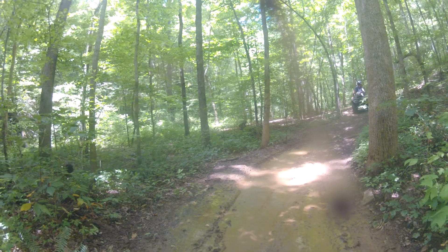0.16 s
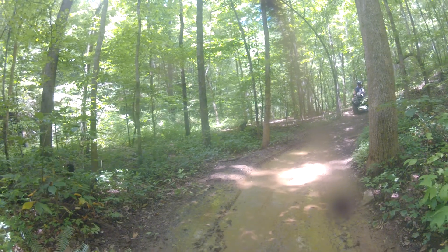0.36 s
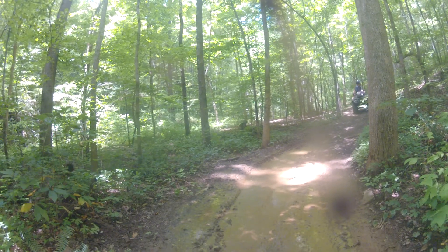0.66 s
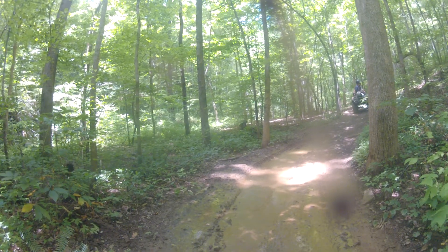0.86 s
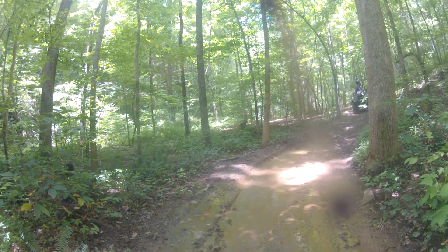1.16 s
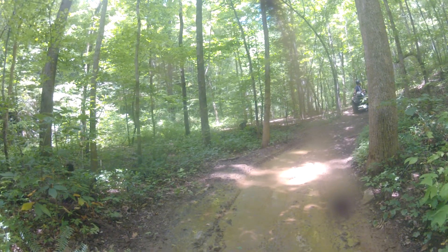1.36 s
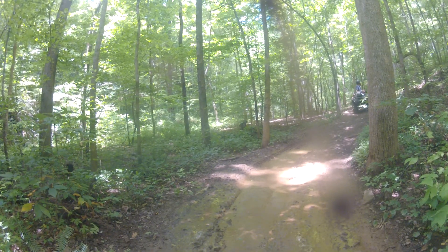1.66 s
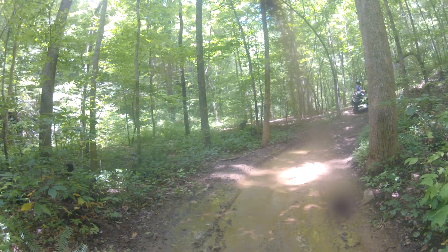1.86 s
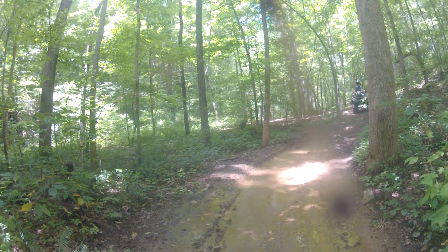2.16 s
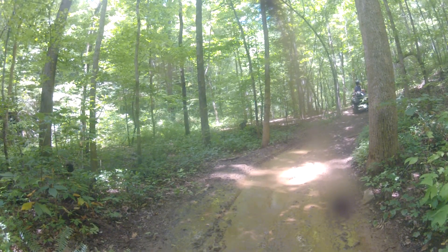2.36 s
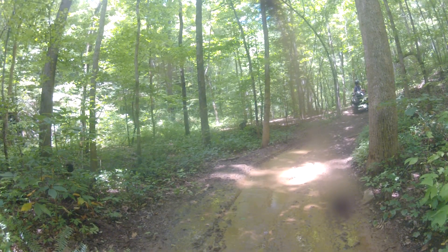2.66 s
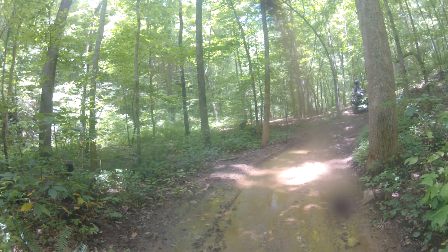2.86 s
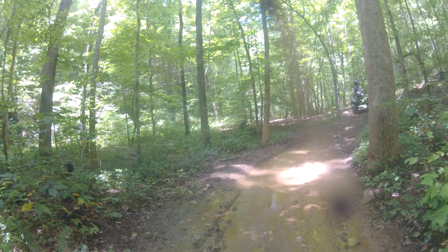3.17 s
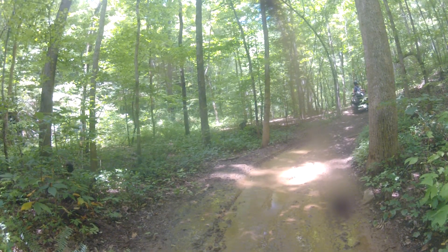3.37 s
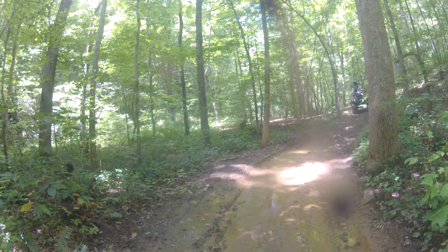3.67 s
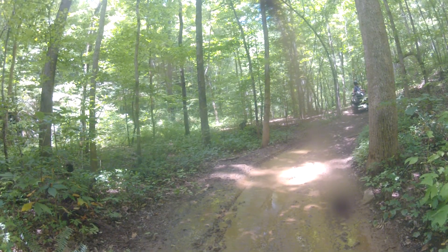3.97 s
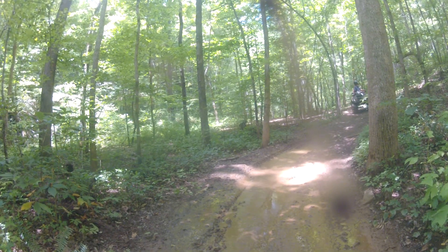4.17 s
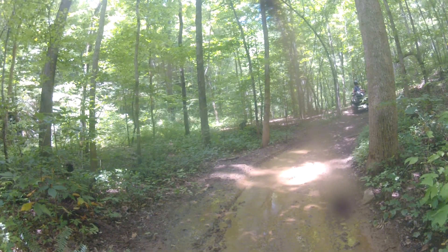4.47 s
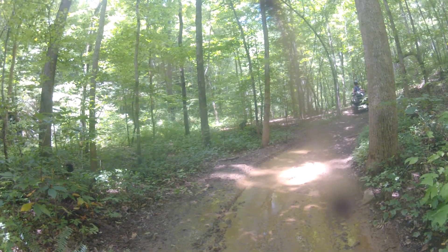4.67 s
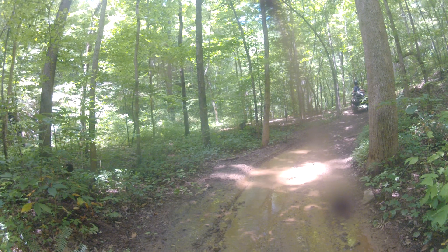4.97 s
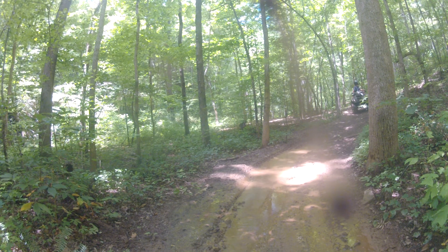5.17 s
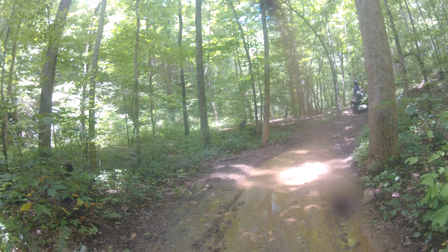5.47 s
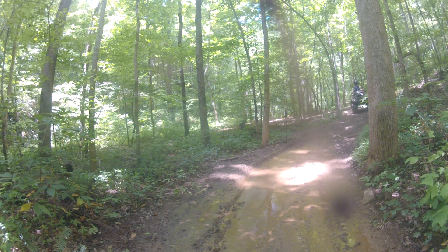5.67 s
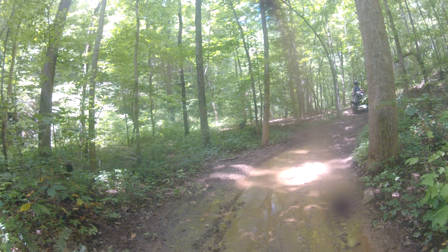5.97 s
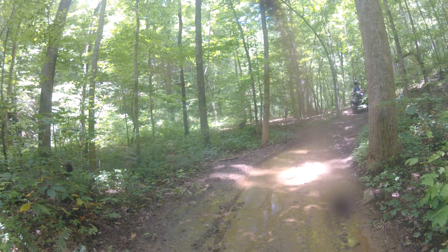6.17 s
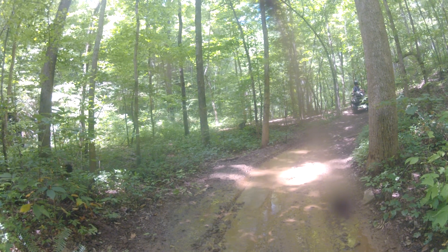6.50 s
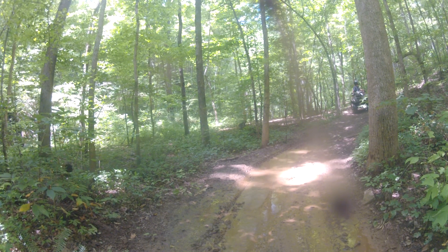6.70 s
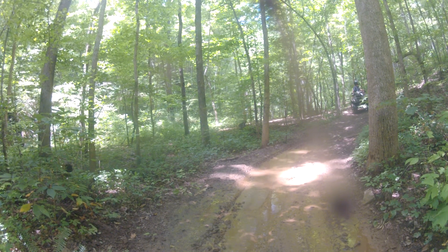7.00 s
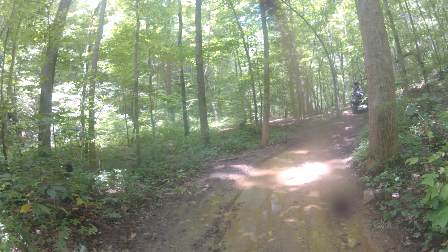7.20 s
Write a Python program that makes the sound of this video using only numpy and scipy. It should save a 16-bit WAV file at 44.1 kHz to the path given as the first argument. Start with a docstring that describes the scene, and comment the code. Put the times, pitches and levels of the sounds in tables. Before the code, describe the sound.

A small single-cylinder trail vehicle engine idles with loose, clattering knocks and a low boom, then thumps and revs up under load at the end.

```python
"""A single-cylinder four-stroke trail vehicle idles on a forest track, with the microphone on its own frame.
The frame booms and hums as engine orders meet its resonances; the mounts pass a drone and the exhaust puffs.
Blows at fixed places in the cycle ring the crankcase, a loose rocker, the drive and the head, over a rumble.
Single hard firings stand out; near the end the engine picks up under load with a few thumps.
The recorder samples at a low rate and holds each sample, which mirrors the treble."""
import sys
import numpy as np
from scipy import signal
from scipy.fft import rfft, irfft
from scipy.io import wavfile
from scipy.ndimage import uniform_filter1d

SR = 44100
rng = np.random.default_rng(int(sys.argv[2]) if len(sys.argv) > 2 else 0)


def generate_wav(signal):
    """Clip the signal to [-1, 1] and save it as 16-bit WAV at the path in sys.argv[1]."""
    frames = np.transpose(np.atleast_2d(signal))
    scaled = np.clip(frames, -1, 1) * 32767
    pcm = np.round(scaled).astype(np.int16)
    wavfile.write(sys.argv[1], SR, pcm)


N = 323694
TIME = np.arange(N) / SR

# Resonances of bodies that sound in several ways; width is taken at half amplitude, levels are relative.
# exhaust pipe and panels: hz, width_hz, level_db
PIPE_MODES = [(172, 46, -6.5), (224, 42, -5.5), (261.6, 49, -0.5), (305, 57, 1.5), (349, 83, 0.5),
              (413.7, 42, -5), (483, 33, -16), (609, 53, -15.5)]
# piston and block at a firing: hz, width_hz, level_db
PISTON_MODES = [(894, 77, -3.5), (947, 50, 0.5), (741, 63, -11.5)]
# rocker and its cover: hz, width_hz, level_db
ROCKER_MODES = [(1704, 50, -12), (1966, 43, -2), (2247, 123, 3), (2348, 80, 8), (2340, 170, -13),
                (2454, 118, -1)]
# cylinder head: hz, width_hz, level_db
HEAD_MODES = [(1815, 52, 5.5), (2066, 47, 5), (2226, 340, 1.5), (3130, 190, -0.5), (3400, 94, -16),
              (3694, 224, 3), (3890, 90, -27)]


def undb(db):
    """Decibels to an amplitude factor."""
    return 10 ** (np.asarray(db) / 20)


def unit(x):
    """Scale to rms 1."""
    return x / np.sqrt(np.mean(x ** 2))


def curve(table):
    """Points joined by straight lines in time."""
    return np.interp(TIME, *np.transpose(table))


def bump(at_s, width_s):
    """A rounded rise from 0 to 1 and back."""
    return np.exp(-((TIME - at_s) / width_s) ** 2)


def late(x, lag_s):
    """The same control, a moment later."""
    return np.interp(TIME - lag_s, TIME, x)


def walk(rate_hz):
    """Random levels, each held for one period of the rate, smoothed twice and scaled to rms 1."""
    hold = int(SR / rate_hz)
    steps = np.repeat(rng.standard_normal(N // hold + 1), hold)
    smooth = uniform_filter1d(uniform_filter1d(steps, hold), hold)
    return unit(smooth[:N])


def ring(x, modes):
    """Pass x through a body with steep resonances, as a causal minimum-phase filter."""
    size = 2 ** 13
    f = np.arange(size // 2 + 1) * SR / size
    power = sum(undb(2 * db) / (1 + (2 * (f - hz) / width) ** 2) ** 2 for hz, width, db in modes)
    # folding the cepstrum onto positive times makes the response causal
    cepstrum = irfft(np.log(power + 1e-9) / 2)
    cepstrum[1:size // 2] *= 2
    cepstrum[size // 2 + 1:] = 0
    response = irfft(np.exp(rfft(cepstrum)))
    return signal.fftconvolve(x, response)[:N]


def clicks(times, sizes):
    """One impulse at each time."""
    out = np.zeros(N)
    inside = (times > 0) & (times < TIME[-1])
    np.add.at(out, (times[inside] * SR).astype(int), sizes[inside])
    return out


def scrape(hits, decay_s):
    """Each blow leaves a short burst of noise that carries the same energy; the energy decays over decay_s."""
    keep = np.exp(-1 / (decay_s * SR))
    energy = signal.lfilter([1 - keep], [1, -keep], hits ** 2 + 1e-18)
    return np.sqrt(energy) * rng.standard_normal(N)


def blows(cycle, pattern, jitter_s, scatter_db):
    """Impulses at fixed places in the engine cycle, each a little early or late, weak or strong."""
    place, db = np.transpose(pattern)
    places = (np.arange(-1, int(cycle[-1]) + 1)[:, None] + place).ravel()
    chance = rng.standard_normal((len(places), 2))
    times = np.interp(places, cycle, TIME, left=-1, right=-1) + jitter_s * chance[:, 0]
    return clicks(times, undb(np.resize(db, len(places)) + scatter_db * chance[:, 1]))


def jolts(table, modes, decay_s):
    """Single heavy blows on a body, with levels relative to the peak of its plain ring."""
    s, db = np.transpose(table)
    hits = clicks(s, undb(db))
    peak = np.abs(ring(signal.unit_impulse(N), modes)).max()
    return ring(hits + 0.37 * scrape(hits, decay_s), modes) / peak


def crank_rpm():
    """The slow course of the engine speed, with a rounded bump at each surge."""
    # hunting idle, then the pick-up: time_s, speed_rpm
    speed = [(0.0, 1477.3), (0.408, 1399.9), (1.125, 1364.1), (1.72, 1399.9), (2.189, 1376.6),
             (2.473, 1413.3), (3.02, 1377.5), (3.546, 1389.5), (4.088, 1441.3), (4.431, 1379.6),
             (4.909, 1421.1), (5.337, 1384.3), (5.994, 1446.8), (6.249, 1343.3), (6.357, 1373.6),
             (6.489, 1647.0), (6.884, 1956.1), (7.34, 2087.7)]
    # brief surges of the idle: time_s, added_rpm
    surges = [(1.397, 76.2), (3.278, 49.7), (4.386, 49.3), (5.465, 42.8)]
    return curve(speed) + sum(rpm * bump(s, width_s=0.089) for s, rpm in surges)


def frame(cycle, firing_hz, load, orders, centre_hz, width_hz, waver_db):
    """Engine orders sweep through a frame resonance; their sum is held near rms 1, so the nearest dominates."""
    out, power = 0, 0
    for multiple, db, load_db in orders:
        hz = multiple * firing_hz
        detuning = centre_hz / width_hz * (hz / centre_hz - centre_hz / hz)
        response = undb(db + load * load_db) / (1 + 1j * detuning)
        # the last factor gives each order its own fixed phase
        wave = np.exp(2j * np.pi * multiple * cycle) * 1j ** (multiple * multiple)
        out = out - np.real(response * wave) * undb(waver_db * walk(14))
        power = power + np.abs(response) ** 2
    return out / np.sqrt(power / 2)


def sway(firing_hz):
    """How hard the frame shakes: strongest, a moment late, when an order sits on its resonance."""
    frame_hz, width_hz, lag_s, off_resonance_db = 44.23, 5.13, 0.073, -47
    # orders that shake the frame: multiple_of_firing_rate, level_at_resonance_db
    shakers = [(3, -13.5), (4, -11)]
    felt_hz = late(firing_hz, lag_s)
    power = undb(off_resonance_db) ** 2
    for multiple, db in shakers:
        size = undb(db) / (1 + (2 * (multiple * felt_hz - frame_hz) / width_hz) ** 2)
        power = power + size ** 2
    return np.sqrt(power)


def boom(cycle, firing_hz, load):
    """Low engine orders shake the frame near its resonance, so the boom swells and thins with the speed."""
    # relative levels: multiple_of_firing_rate, level_db, added_under_load_db
    boom_orders = [(3, 4, -5), (4, 8.5, -22), (5, -5.5, -12)]
    tone = frame(cycle, firing_hz, load, boom_orders, centre_hz=45.67, width_hz=11.7, waver_db=0.5)
    return tone * sway(firing_hz)


def hum(cycle, firing_hz, load):
    """Higher orders excite a resonance about an octave above the boom; the hum drops out briefly at times."""
    # relative levels: multiple_of_firing_rate, level_db, added_under_load_db
    hum_orders = [(6, -20, 31), (8, 4, -9), (9, -0.5, -6), (10, 0, -15)]
    # course of the level before dips and trim: time_s, level_db
    hum_course = [(0, -34), (0.6, -32.5), (1.2, -34.5), (3.2, -34.5), (4.35, -38.5), (5.3, -30.5),
                  (6.1, -35), (6.55, -35), (6.85, -24.5), (7.34, -29.0)]
    # brief drop-outs: time_s, change_db
    hum_dips = [(0.24, -14), (0.95, -6.5), (5.57, -10), (6.25, -8.5)]
    level_db = curve(hum_course) + sum(db * bump(s, width_s=0.058) for s, db in hum_dips)
    tone = frame(cycle, firing_hz, load, hum_orders, centre_hz=94.3, width_hz=16.5, waver_db=2.5)
    return tone * undb(level_db - 0.9 + 1.3 * load)


def drone(cycle, load):
    """Crank and firing harmonics that the engine mounts pass on; each wavers a little."""
    # relative levels: multiple_of_firing_rate, level_at_idle_db, level_under_load_db
    drone_orders = [(2, -29, 8), (4, 6, 9), (6, 2.5, -13), (7, -1.5, -3), (10, -6, -2), (11, -8.5, -3),
                    (13, -19, -2), (14, -7, -7), (15, -2, -2), (16, -8.5, -2.5), (17, -7.5, -27),
                    (19, -4.5, -10), (20, -14, -2), (21, -13, -6.5), (22, -7, -10), (26, -4.5, -13)]
    # course of the level before a trim: time_s, level_db
    drone_course = [(0, -42), (0.6, -48.5), (1.75, -41.5), (3.9, -41.0), (4.4, -46.0), (4.7, -40),
                    (5.2, -46.5), (6.1, -46), (6.5, -40.5), (7.34, -42.5)]
    out = 0
    for multiple, idle_db, load_db in drone_orders:
        db = idle_db + load * (load_db - idle_db) + 1.5 * walk(9)
        # under load the phase wanders too
        phase = multiple * cycle + rng.random() + 0.0069 * multiple * load * walk(18)
        out = out + undb(db) * np.sin(2 * np.pi * phase)
    return out * undb(curve(drone_course) + 2.5)


def exhaust(cycle, load):
    """Pressure pulses ring the pipe and the panels, with an equally strong wake that repeats every cycle."""
    # pulses in one cycle: place_cycles (0-1), relative level_db
    puff_pattern = [(.0, -4), (0.191, -1.5), (0.257, -1.5), (.42, -0.5), (0.502, -2.5), (0.691, -2),
                    (0.781, 0.5), (.89, -4)]
    # course of the level before a trim: time_s, level_db
    exhaust_course = [(0, -36.5), (0.6, -42), (1.2, -40.0), (4.4, -39.5), (5.4, -35.5), (6.1, -36.0),
                      (6.5, -33.0), (6.7, -37.0), (7.05, -33.5), (7.34, -35.5)]
    hits = blows(cycle, puff_pattern, jitter_s=0.00032, scatter_db=2.5)
    puffs = unit(ring(hits + 0.5 * scrape(hits, decay_s=0.011), PIPE_MODES))
    # the wake is one random waveform, replayed each cycle with a wavering level
    size = 512
    shape = irfft(np.exp(2j * np.pi * rng.random(size // 2 + 1)))
    wake = np.interp(cycle, np.arange(size) / size, shape, period=1) * undb(2 * walk(20))
    both = unit(puffs + unit(ring(wake, PIPE_MODES)))
    return both * undb(curve(exhaust_course) + 0.72 - 0.9 * load)


def crankcase(cycle, load):
    """The piston knocks at each firing and slaps the block; gear blows ring the case, more so under load."""
    # piston slaps: place_cycles (0-1), relative level_db
    slap_pattern = [(0.95, -3), (0.0394, -4.5), (.36, -3), (.46, -4.5), (.66, -3)]
    # gear blows: place_cycles (0-1), relative level_db
    gear_pattern = [(0.0, 1), (0.29, 3), (0.4, -7.5), (0.52, 0), (0.67, -2)]
    # resonances of the block: hz, width_hz, relative level_db
    block_modes = [(684, 12, -14), (758, 67, -4.5), (909, 79, -3), (946.7, 36, 2), (1169, 60, -5.5)]
    # resonances of the case: hz, width_hz, relative level_db
    case_modes = [(906, 140, -5.5), (1173, 92, 0.5), (1222, 47, -6.5), (1276, 55, -2.5), (1355, 34, -8.5)]
    firing = blows(cycle, [(0.945, 0)], jitter_s=0.0005, scatter_db=2.5)
    knock = unit(ring(firing + 0.2 * scrape(firing, decay_s=0.008), PISTON_MODES))
    slaps = blows(cycle, slap_pattern, jitter_s=0.0006, scatter_db=0.5)
    block = unit(ring(slaps + 1.37 * scrape(slaps, decay_s=0.013), block_modes))
    gears = blows(cycle, gear_pattern, jitter_s=0.000967, scatter_db=2.5)
    case = unit(ring(gears + 2.06 * scrape(gears, decay_s=0.017), case_modes))
    mix = knock * undb(-8 - 3.3 * load) + block * undb(-4 - 2 * load) + case * undb(-5 + 3.7 * load)
    return mix * undb(-41.5 + 2 * load)


def loose_rocker(cycle, load):
    """A loose rocker knocks hard once a cycle, bounces and knocks again more softly; load takes up its slack."""
    loosen_s, tight_db = 1.6, -10
    soften_at_s, soften_s, soften_db = 4.8, 0.25, -3
    delayed_hz, delayed_width_hz = 2157, 240
    # knocks in one cycle: place_cycles (0-1), relative level_db
    knock_pattern = [(.958, 0), (.05, -13), (.1, -18), (.147, -17), (.316, -8), (.62, -19)]
    hits = blows(cycle, knock_pattern, jitter_s=0.00014, scatter_db=2.2)
    knock = ring(hits + 0.17 * scrape(hits, decay_s=0.03), ROCKER_MODES)
    # an allpass holds back the band around delayed_hz, which smears each knock
    pole = np.exp((2j * delayed_hz - delayed_width_hz) * np.pi / SR)
    allpass = np.poly([pole, pole.conjugate()]).real
    smeared = unit(signal.lfilter(allpass[::-1], allpass, knock))
    # the rocker works loose as the idle settles, and later softens a little
    slack_db = tight_db * np.maximum(1 - TIME / loosen_s, 0)
    slack_db += soften_db * np.clip((TIME - soften_at_s) / soften_s, 0, 1)
    return smeared * undb(-42.5 + slack_db - 33 * load)


def cam_chain():
    """The cam chain whirrs in the rocker cover: steady noise through the same resonances."""
    return unit(ring(rng.standard_normal(N), ROCKER_MODES)) * undb(-55)


def drive(cycle, rpm, load):
    """Chain and gear backlash: sharp uneven ticks at fixed places, harder while the crank gains speed."""
    snatch_db, snatch_rpm_per_s, snatch_lag_s = 4.5, 1000, 0.053
    # ticks in one cycle: place_cycles (0-1), relative level_db
    clatter_pattern = [(.06, -7), (.13, -8), (.21, -5), (0.262, -7), (.35, -6.5), (.44, -5), (.48, -7),
                       (.57, -4), (.755, -2.5), (.86, -6.5), (0.929, -5.5)]
    # resonances of the drive: hz, width_hz, relative level_db
    drive_modes = [(2020, 400, -2.5), (2540, 740, -7), (3418, 260, -2.5), (3656, 160, -3.5), (4370, 355, 3),
                   (4840, 1210, -4), (5520, 1250, -11)]
    hits = blows(cycle, clatter_pattern, jitter_s=0.0011, scatter_db=1.7)
    ticks = 0.6 * hits + scrape(hits, decay_s=0.0016)
    clatter = unit(ring(ticks + 0.64 * scrape(hits, decay_s=0.006), drive_modes))
    snatch = late(np.clip(np.gradient(rpm, TIME) / snatch_rpm_per_s, 0, 1), snatch_lag_s)
    # the clatter drops away briefly once the engine pulls
    lull_db = -7 * bump(6.96, width_s=0.1)
    return clatter * undb(-45 - 4 * load + snatch_db * snatch + lull_db + 0.5 * walk(7))


def tappets(cycle, load):
    """Valves seat against the cylinder head, louder under load."""
    # seatings in one cycle: place_cycles (0-1), relative level_db
    tappet_pattern = [(.23, 3.5), (.62, -5.5), (.93, -1)]
    hits = blows(cycle, tappet_pattern, jitter_s=0.0006, scatter_db=3)
    taps = unit(ring(hits + 4.3 * scrape(hits, decay_s=0.0075), HEAD_MODES))
    return taps * undb(-53 + 6.6 * load)


def rumble():
    """A broad, wavering bed of noise, shaped by wide and mostly low resonances."""
    # shape of the rumble: hz, width_hz, relative level_db
    rumble_modes = [(65.4, 26, -3.5), (132, 64, -0.5), (222, 85, -3.5), (520, 650, -20.5),
                    (1845, 340, -24.5)]
    return unit(ring(rng.standard_normal(N), rumble_modes)) * undb(-42.7 + 1.5 * walk(5))


def hard_firings():
    """Single hard firings knock the block through the piston resonances."""
    # firings that stand out: time_s, relative level_db
    firings = [(0.106, -30), (0.487, -27.5), (1.141, -20.5), (1.57, -26), (2.861, -32), (3.034, -25),
               (3.973, -28), (4.48, -27.5), (5.076, -28.5), (6.351, -22), (6.434, -20.5), (6.536, -24),
               (6.578, -32), (6.707, -32), (7.069, -24)]
    return jolts(firings, PISTON_MODES, decay_s=0.0055) * undb(-3)


def thumps():
    """The chassis thumps as the drive takes up, ringing the pipe and more faintly the head."""
    # blows: time_s, relative level_db
    thump_times = [(6.205, -21.5), (6.452, -28), (6.478, -26), (6.513, -17.5), (6.545, -23), (6.582, -19.5)]
    low = jolts(thump_times, PIPE_MODES, decay_s=0.013) * undb(-2.5)
    high = jolts(thump_times, HEAD_MODES, decay_s=0.0073) * undb(-11)
    return low + high


def scene():
    """The engine's regular parts follow one crankshaft; its speed sets the boom, the load and the clatter."""
    load_from_rpm, load_span_rpm = 1450, 300  # the drive takes up over this range
    rpm = crank_rpm()
    firing_hz = rpm / 120  # a four-stroke fires every second turn
    cycle = -0.402 + np.cumsum(firing_hz) / SR  # engine cycles of two crank turns
    load = np.clip((rpm - load_from_rpm) / load_span_rpm, 0, 1)
    out = boom(cycle, firing_hz, load)
    out += hum(cycle, firing_hz, load)
    out += drone(cycle, load)
    out += exhaust(cycle, load)
    out += crankcase(cycle, load)
    out += loose_rocker(cycle, load)
    out += cam_chain()
    out += drive(cycle, rpm, load)
    out += tappets(cycle, load)
    out += rumble()
    out += hard_firings()
    out += thumps()
    return out[None]


def record(dry):
    """The recorder samples at 12 kHz and holds each value: a gap at 6 kHz and mirror images above it."""
    band = signal.sosfilt(signal.ellip(10, 0.3, 60, 5800, fs=SR, output="sos"), dry)
    fine = signal.resample_poly(band, 160, 147, axis=-1)  # to 48 kHz
    held = np.repeat(fine[:, ::4], 4, axis=-1)  # every fourth sample, held
    out = signal.resample_poly(held, 147, 160, axis=-1)[:, :N]
    return signal.sosfilt(signal.ellip(10, 0.2, 80, 15000, fs=SR, output="sos"), out)


dry = scene()
out = record(dry)
generate_wav(out)
```